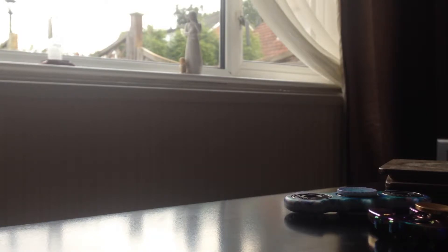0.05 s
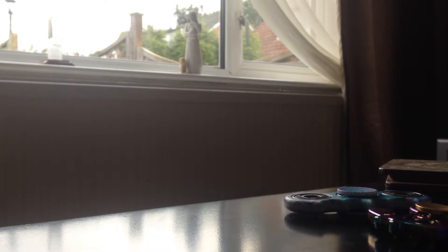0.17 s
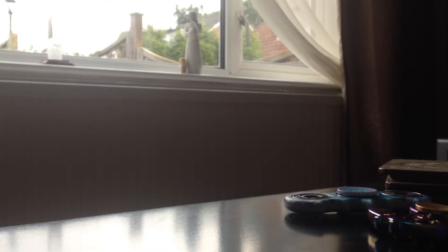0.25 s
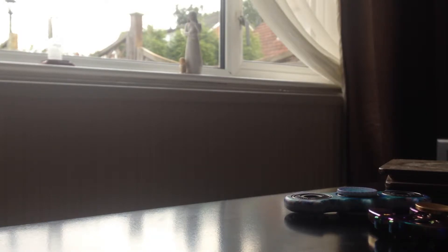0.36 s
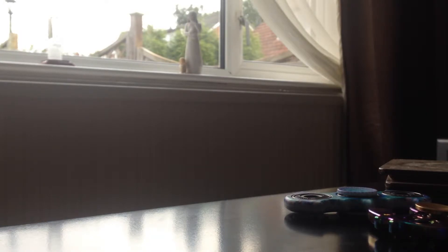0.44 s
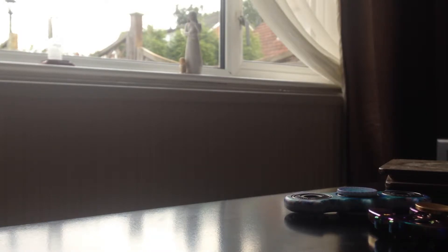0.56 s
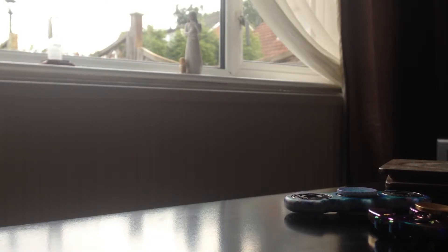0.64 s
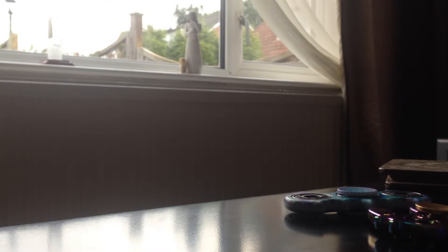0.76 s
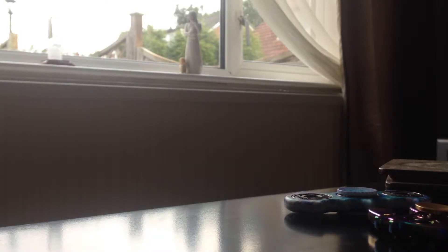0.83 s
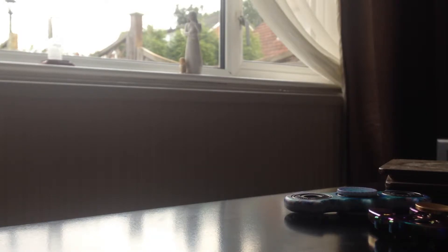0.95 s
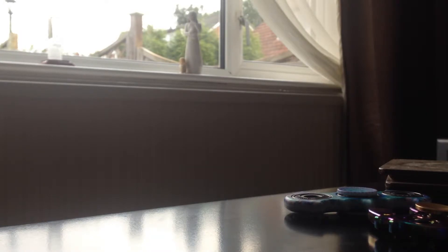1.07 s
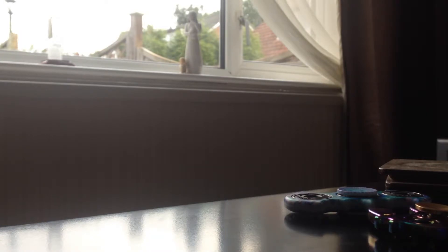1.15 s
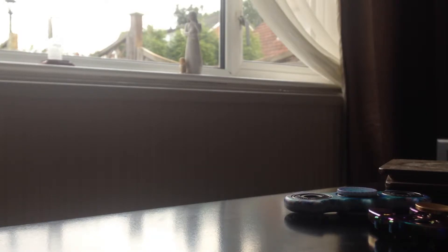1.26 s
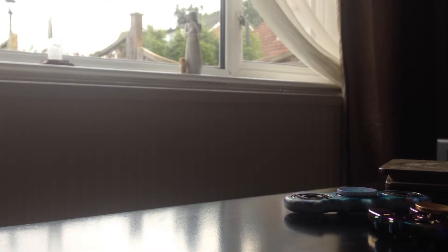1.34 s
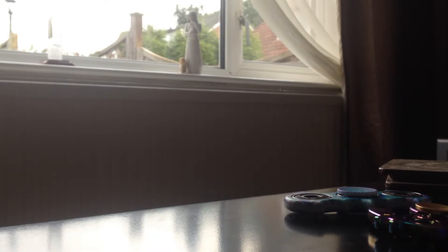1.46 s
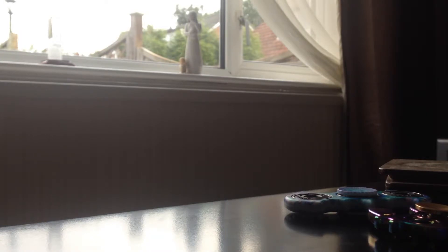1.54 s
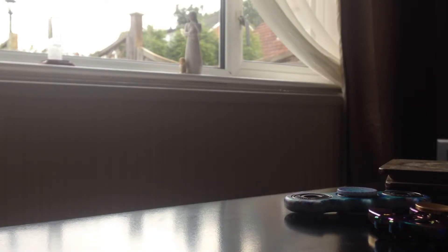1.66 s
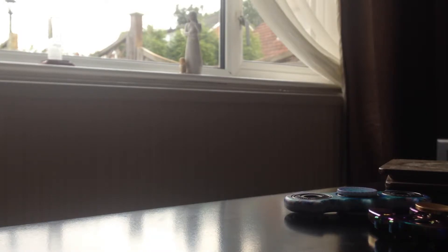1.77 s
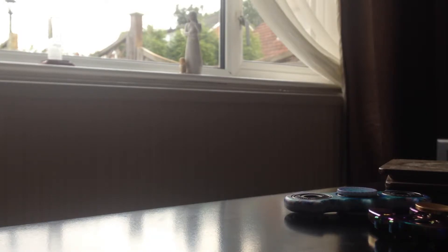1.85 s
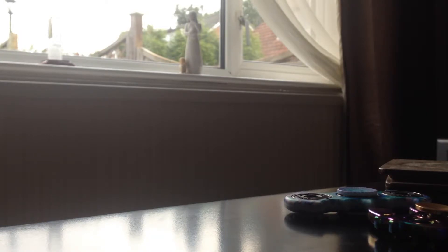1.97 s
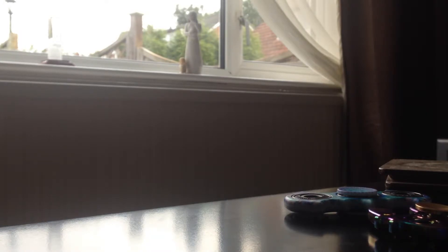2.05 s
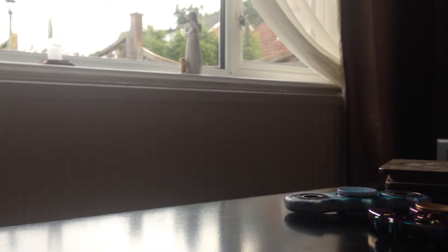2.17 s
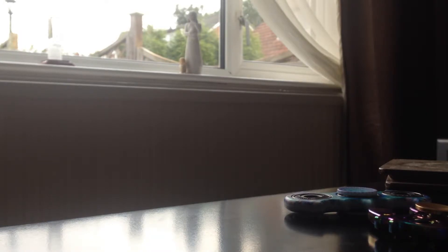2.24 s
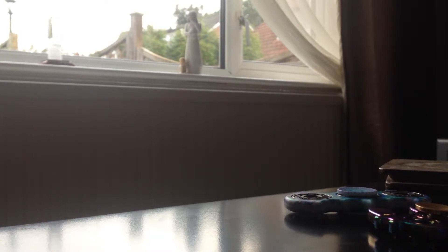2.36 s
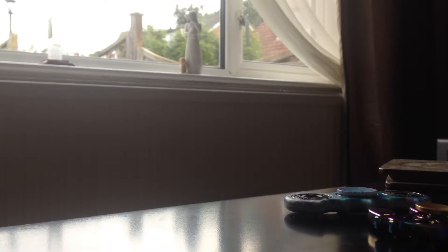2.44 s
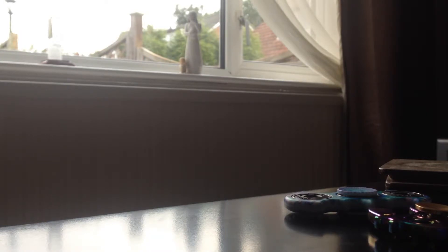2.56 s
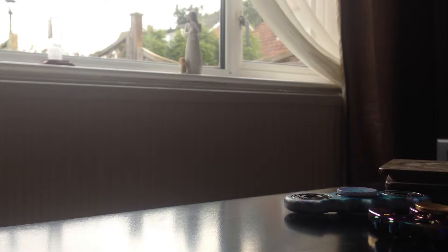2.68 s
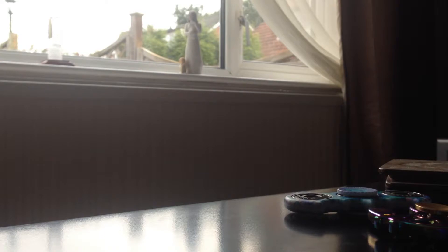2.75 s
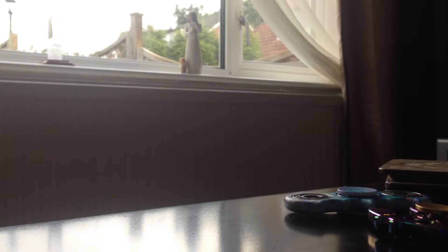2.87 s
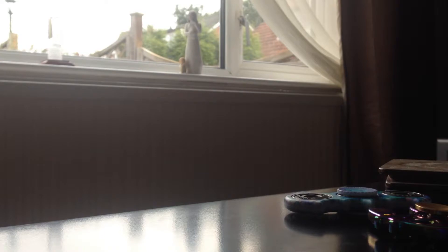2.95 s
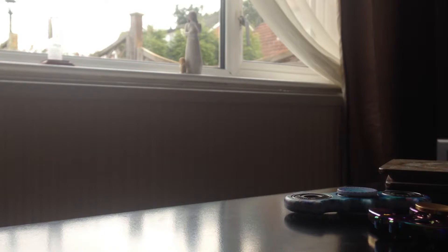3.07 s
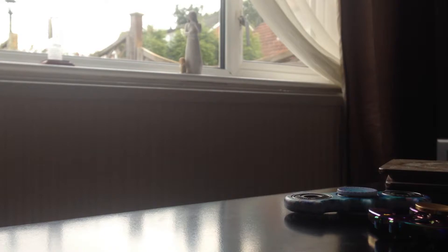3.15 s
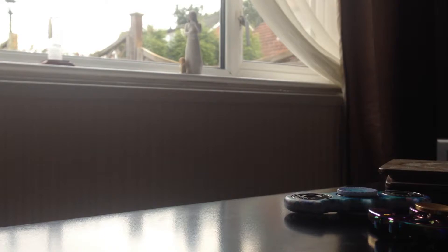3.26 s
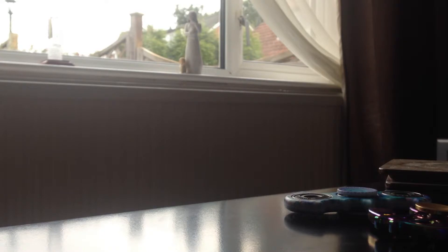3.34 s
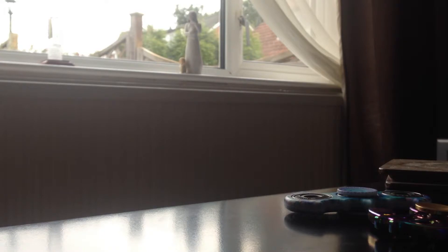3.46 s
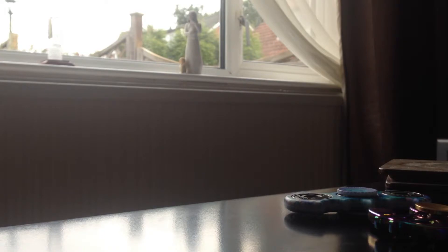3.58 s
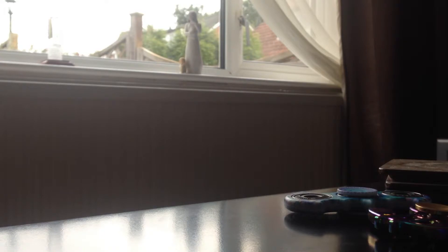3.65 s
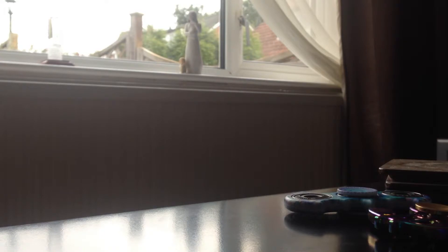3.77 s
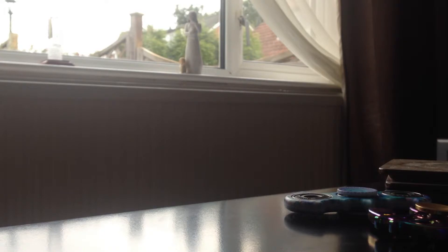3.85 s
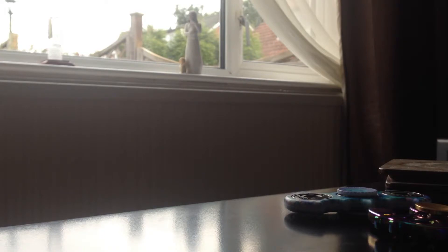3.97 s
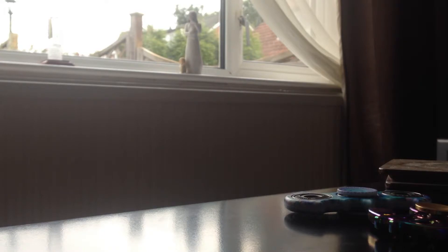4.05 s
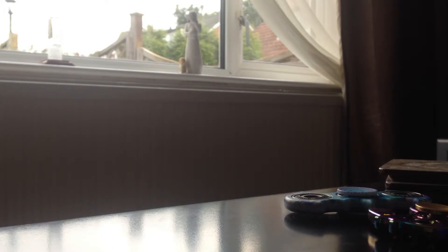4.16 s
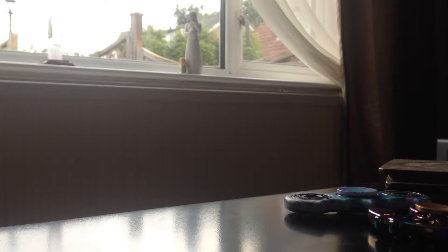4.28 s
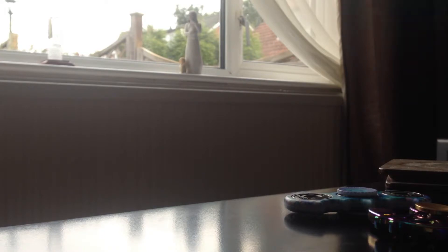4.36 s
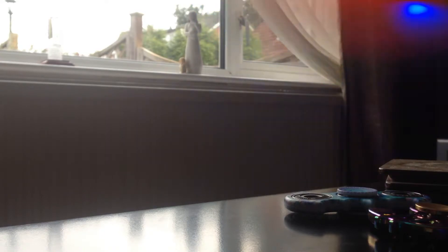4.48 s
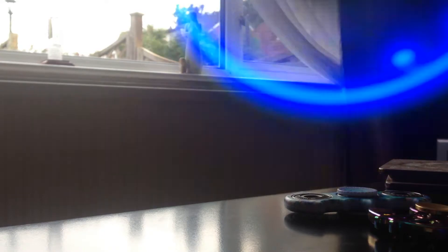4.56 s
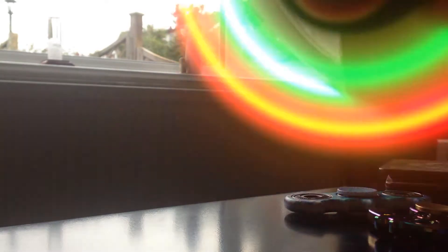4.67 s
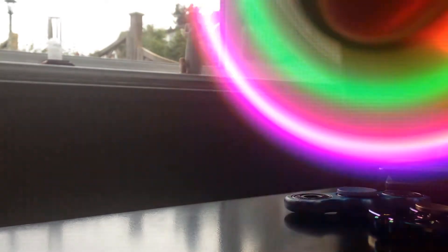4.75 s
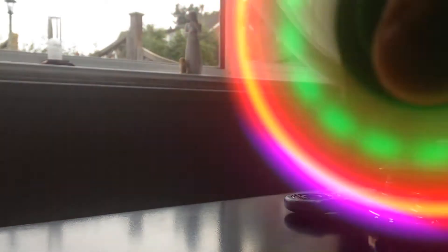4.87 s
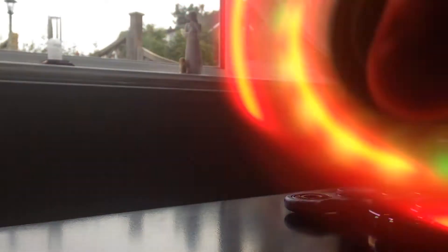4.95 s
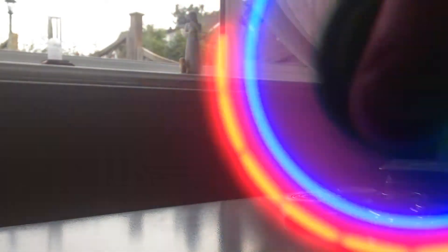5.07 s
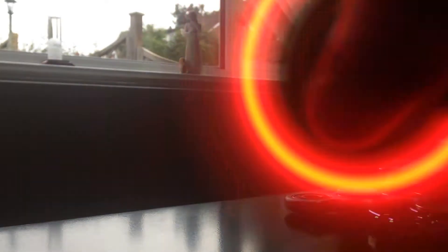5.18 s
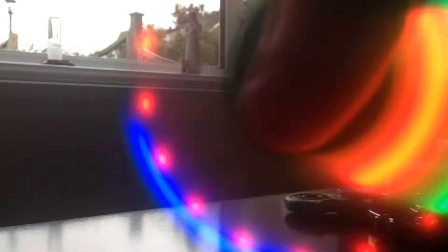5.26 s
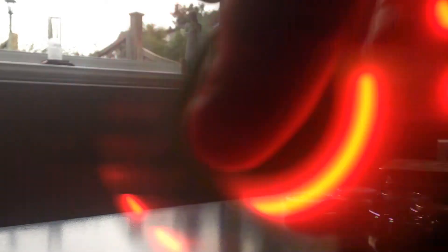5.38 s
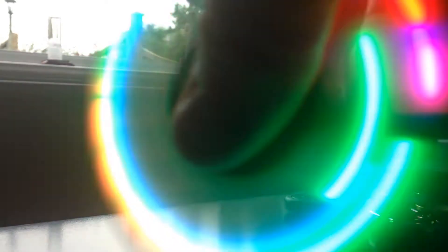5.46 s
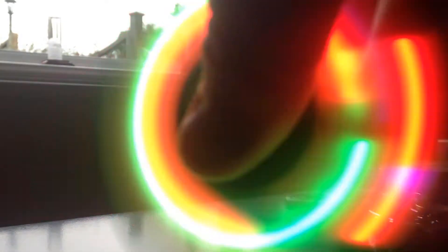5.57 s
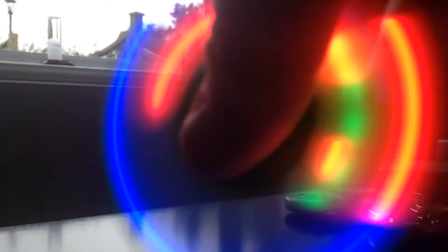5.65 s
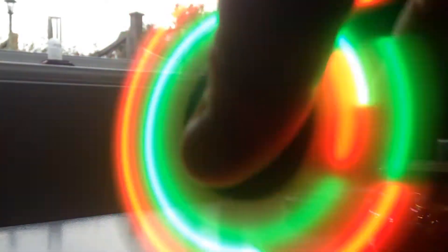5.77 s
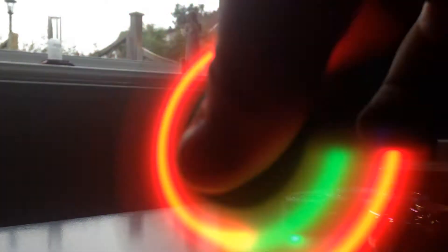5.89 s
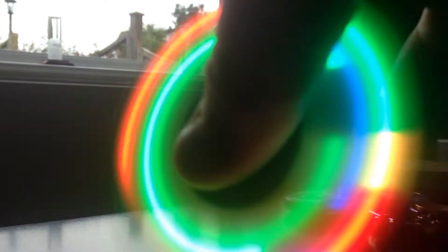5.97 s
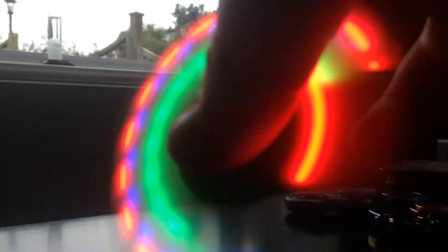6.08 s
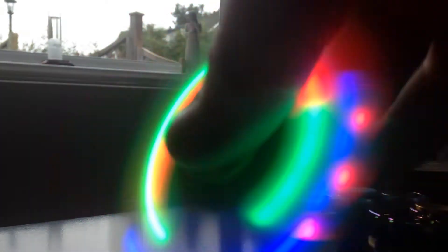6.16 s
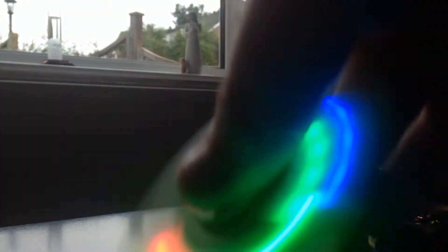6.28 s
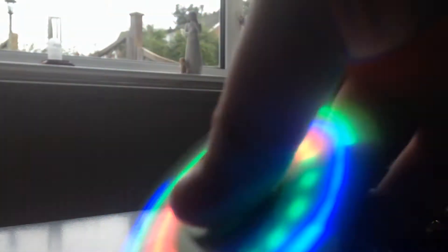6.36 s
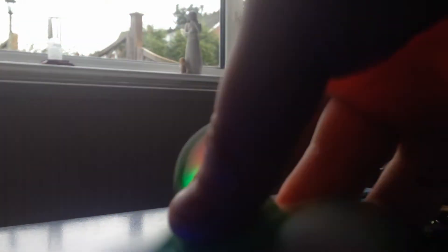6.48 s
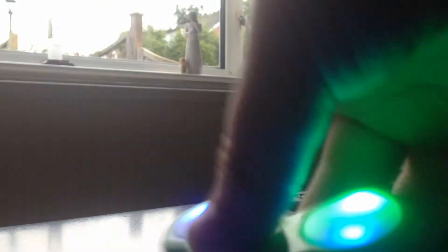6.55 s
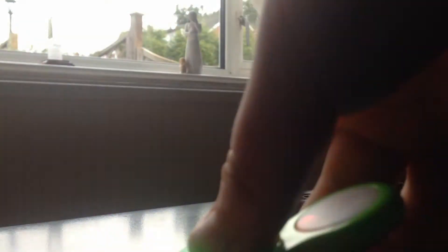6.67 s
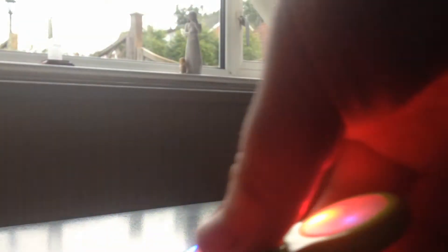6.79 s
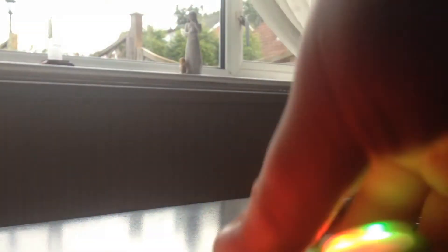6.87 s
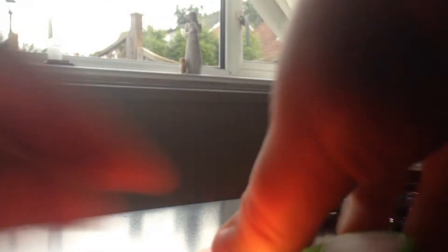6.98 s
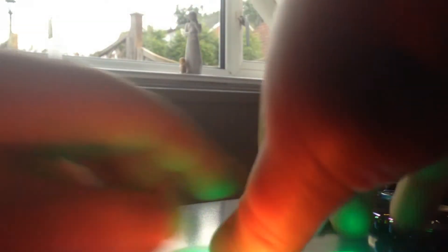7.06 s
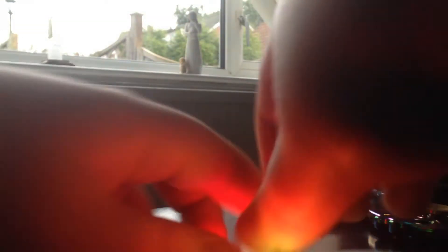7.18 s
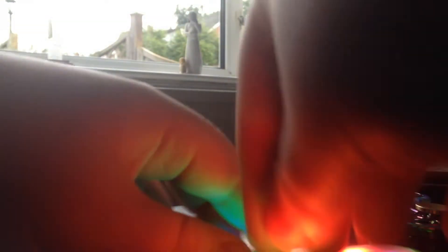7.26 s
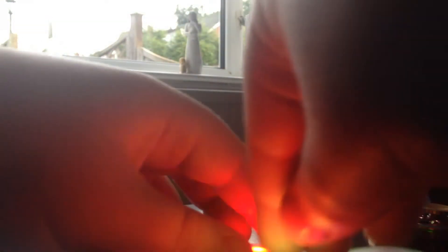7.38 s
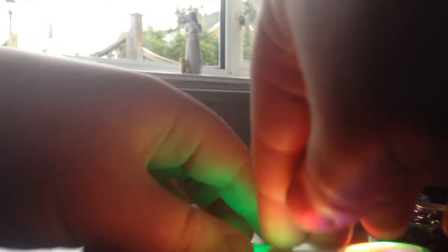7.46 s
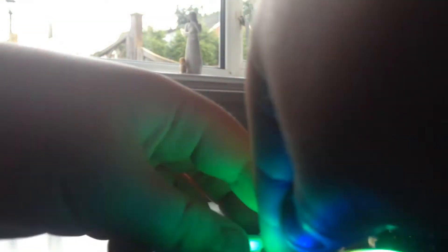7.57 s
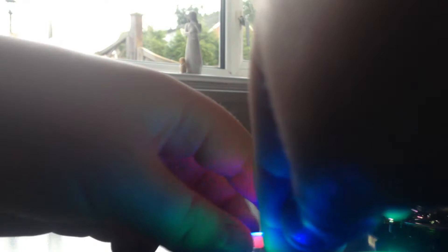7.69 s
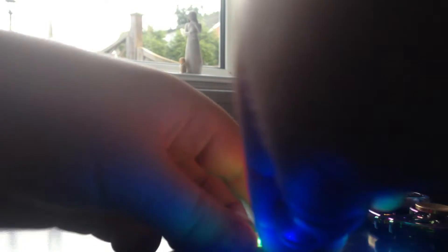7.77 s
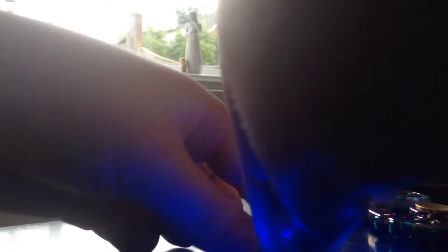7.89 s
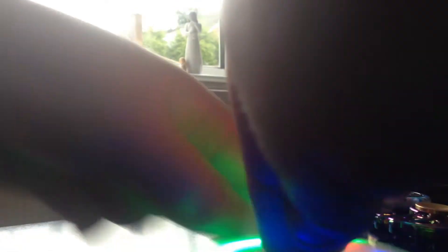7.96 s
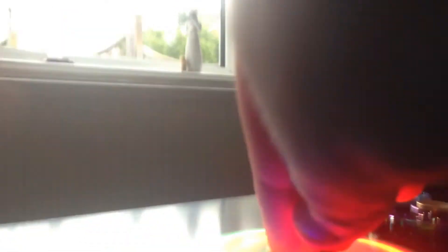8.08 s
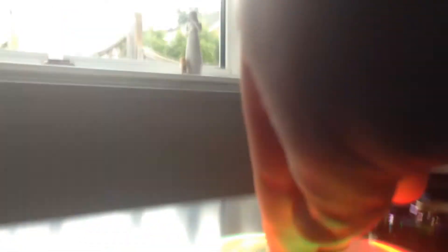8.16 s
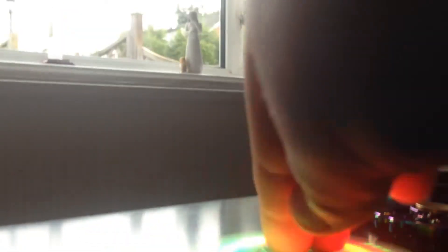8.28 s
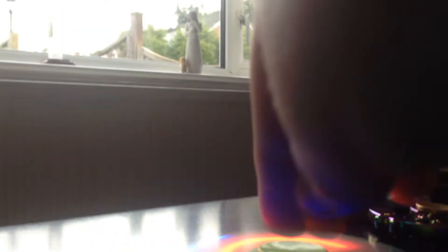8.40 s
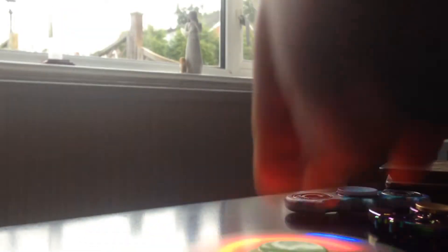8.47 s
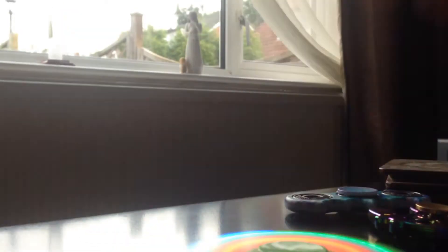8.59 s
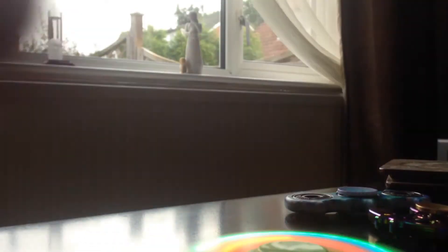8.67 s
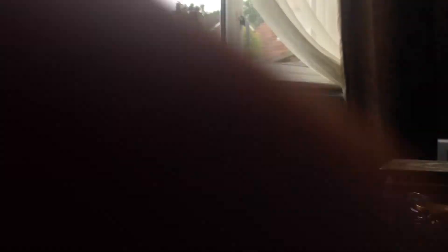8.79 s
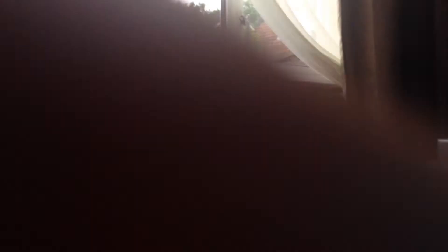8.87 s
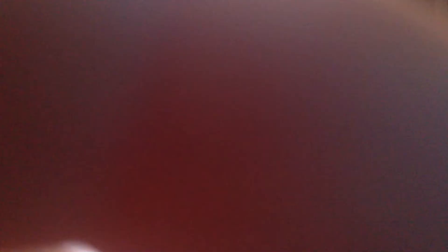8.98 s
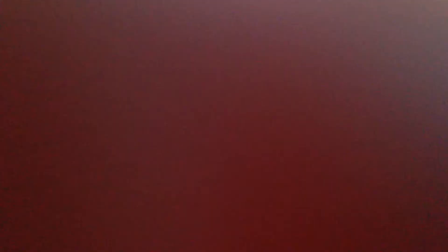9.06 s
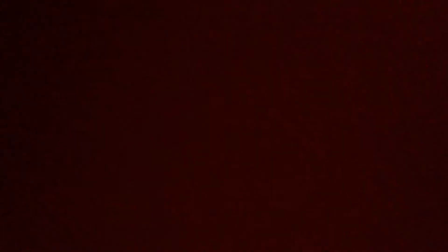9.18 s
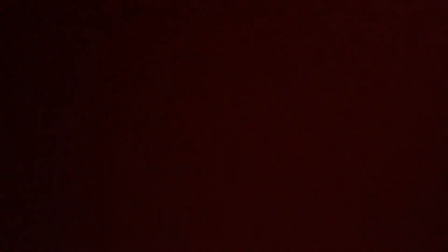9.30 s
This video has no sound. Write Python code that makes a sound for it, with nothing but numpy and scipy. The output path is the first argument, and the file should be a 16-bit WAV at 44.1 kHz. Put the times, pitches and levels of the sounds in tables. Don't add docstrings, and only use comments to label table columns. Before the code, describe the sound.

Close to the microphone in a still indoor room, a hand flicks a plastic spinner after a long near-silent wait. The metallic, airy whir swells, steadies, then ends in a rapid burst of very sharp clacks on the table top. Landings, small bounces, rubs and ticks follow, then a second flick starts a quieter rattling spin that lasts to the end, with a few dull bumps.

```python
import sys
import numpy as np
from scipy import signal
from scipy.io import wavfile

SR = 44100
rng = np.random.default_rng(int(sys.argv[2]) if len(sys.argv) > 2 else 0)


def decibels_to_gain(level_db):
    exponent = np.asarray(level_db, float) / 20
    return 10 ** exponent


def wav_record(signal):
    frames = np.transpose(np.atleast_2d(signal))
    bounded = np.clip(frames, -1, 1)
    quanta = np.round(bounded * 32767).astype(np.int16)
    wavfile.write(sys.argv[1], SR, quanta)


N = 411453

# f/Hz, level/dB per Hz
AIR_COLOUR = [(15, -30), (25, -16), (60, -5), (102, -4), (149, -3.5), (416, -8), (659, -5), (911, -12.5),
              (1260, -17.5), (2050, -13.5), (2910, -19.5), (6000, -22.5), (14400, -27.5), (16000, -30)]
# f/Hz, level/dB rms, phase/rad
HUM_TONES = [(99.2, -79, 0.0), (100.71, -81, -0.65)]
# t/s, hold/s, level/dB
CLOTH_RUBS = [
    (0.0, 0.4, -69),
    (1.6, 0.43, -73.5),
    (0.41, 0.039, -71.5),
    (2.95, 0.18, -72.5),
    (3.14, 0.042, -70),
    (3.4, 0.24, -70.5),
]
# t/s, hold/s, level/dB
TRAFFIC_SWELLS = [
    (0.0, 0.14, -71),
    (0.42, 0.036, -77),
    (1.33, 0.66, -74.5),
    (2.95, 0.27, -78.5),
    (3.3, 0.38, -73.5),
    (4.98, 0.37, -70),
    (5.5, 0.13, -66.5),
]
# t/s, peak level/dB, table share/dB, edge share/dB
FINGER_TICKS = [(0.1624, -60, -2.5, 10), (0.8048, -57, -6, -14), (1.041, -50, -19, -23),
                (1.074, -50, -27, -28), (1.1608, -49.5, 0, -28), (1.488, -48, 0, -29),
                (1.6756, -44.5, -16, -14), (1.8747, -53, -4, 3), (2.142, -43.5, -3.5, -29),
                (2.3331, -58.5, -29, 12.5), (2.6292, -51, -3, -21), (2.8852, -51, -2, -18),
                (2.9694, -57.5, -2, -19)]
# t/s, peak level/dB, f/Hz, decay/cycles
BALL_CHINKS = [(1.041, -70, 5750, 110), (1.6844, -68, 5700, 120), (2.333, -61, 5230, 83),
               (4.622, -37, 5020, 8.3), (6.493, -24.5, 5730, 21), (7.164, -35, 5810, 21),
               (7.183, -40, 5760, 29), (7.352, -54, 6030, 19), (7.3796, -55, 6040, 17),
               (7.204, -49, 5700, 12), (8.096, -23.5, 5810, 26), (8.103, -24.5, 5840, 21)]
# t/s, peak level/dB, f/Hz, decay/cycles
LOW_KNOCKS = [(1.333, -58, 400, 1), (1.626, -53.5, 330, 0.59), (2.732, -59, 333, 1.1),
              (2.887, -55, 400, 0.99), (3.918, -42, 122, 0.22), (6.444, -35, 595, 3.9),
              (8.082, -24, 402, 3.5), (8.092, -28, 558, 5.1), (9.134, -29.5, 378, 1.16),
              (9.214, -34, 190, 0.96), (9.278, -29, 173, 0.54)]

# t/s, peak level/dB, wood share/dB, edge share/dB
FLICK_HITS = [
    (3.8452, -34, -2, -20),
    (3.8496, -24.5, -17, -9.5),
    (3.8716, -25.5, -18, -8),
    (3.9174, -41, -3.5, -19),
]
STOP_HITS = [
    (6.4567, -3.5, -17, -14.5),
    (6.4772, -1.5, -17, -18),
    (6.4944, -18.5, -8.5, -15.5),
    (6.5121, -3, -12.5, -20),
    (6.5213, -32, -1, 4),
    (6.554, -3, -15, -16),
    (8.0314, -61, 6.5, 6.5),
    (8.0834, -21, -5, -10),
    (8.094, -17.5, -10.5, 0.5),
]
SET_DOWN_HITS = [
    (6.9814, -37, -7, -11),
    (6.9935, -3, -12.5, -16.5),
    (7.22, -4.5, -9, -33),
    (7.2324, -15, -12, -19),
    (7.2454, -25.5, 2, -7.5),
    (7.2614, -35.5, -1.5, -18.5),
    (7.4874, -10.5, -9.5, -19.5),
]
NUDGE_HITS = [(7.0684, -46.5, 16, -0.5), (7.1072, -22.5, -1.5, -10), (7.1467, -32, -12, -8),
              (7.1526, -30, 2.5, 2.5), (7.1656, -31.5, -1, -3), (7.2036, -47, -1, -20),
              (7.395, -51, -19, -5), (7.4076, -47, 0, -24), (7.6425, -38.5, -4.5, -15),
              (7.656, -37.5, -10, -12), (7.6824, -46, -5, -13), (7.7114, -51, 0, -13),
              (7.7692, -42, 0, -23), (7.7897, -39.5, 7.5, -6), (7.8321, -46, -18, -9.5)]

# f/Hz, level/dB, t60/s
SHELL_MODES = [(2050, -20.5, 0.01), (2800, -12.5, 0.003), (3080, -7, 0.019), (3400, -0.5, 0.0092),
               (4590, 5, 0.0053), (5020, -1.5, 0.006), (5600, 2.5, 0.002), (5900, 0.5, 0.0058),
               (6350, -8.5, 0.0055)]
# f/Hz, level/dB, t60/s
TABLE_MODES = [(673.5, -3.5, .07), (769, -2, 0.052), (880, 0.5, .055), (958, -3, 0.045), (1070, -3, 0.046),
               (1580, -18, 0.046)]
# f/Hz, level/dB, t60/s
EDGE_MODES = [(6950, 9, 0.0017), (8100, 9.5, 0.002), (9960, 4, 0.0038), (11200, 0, 0.0013),
              (12800, -3, .003), (14300, -3.5, .003)]
# f/Hz, level/dB, t60/s
PANEL_MODES = [(430, 0, .12), (597, -3, .08)]
# low f/Hz, high f/Hz, level/dB, t60/s
ROOM_BANDS = [(357, 430, -45, 0.27), (600, 1320, -34.5, 0.21), (1200, 2300, -32, 0.18),
              (2400, 3000, -37, 0.13), (3480, 12000, -44.5, 0.18), (6800, 21000, -43, .16)]

# t/s, hold/s, level/dB
GUSTS = [
    (3.85, .06, -55),
    (4.38, 0.2, -55.5),
    (4.75, 1.77, -59.5),
    (7.14, .14, -56),
    (7.51, .07, -63),
    (8.06, 0.035, -56),
    (9.2, .02, -45),
]
# t/s, level/dB
NEARNESS_CURVE = [
    (3.88, -48),
    (3.93, -61),
    (3.97, -66.5),
    (4.26, -60.5),
    (4.5, -48.5),
    (4.56, -48),
    (4.59, -56.5),
    (5.3, -53),
    (6.43, -53),
]
# t/s, cage f/Hz, race f/Hz
GRIP_TUNING = [
    (4.2, 4150, 5950),
    (4.29, 3400, 5900),
    (4.38, 4100, 5100),
    (4.52, 4050, 5900),
    (4.6, 4080, 5900),
    (4.65, 4080, 5130),
    (5.45, 4050, 5396),
    (5.66, 4200, 5900),
    (6.44, 4200, 5970),
]
# t/s, hold/s, level/dB against the free spin
THUMB_SQUEEZES = [
    (4.655, 0.14, 8),
    (4.9, 0.015, -6),
    (4.965, .02, 2),
    (5.03, 0.011, -1),
    (5.14, 0.061, 1),
    (5.35, 0.16, 1.5),
    (6.2, .15, -8),
]
# f/Hz (or a part tuned by the grip), width/Hz, level/dB
HELD_MODES = [
    [(650, 400, -12), (1380, 100, 1.5), (1750, 250, -6)],
    [("cage", 400, -3), (2900, 600, -8), (3450, 600, -8), (10300, 800, -11), (12300, 1800, -14),
     (14400, 2200, -9)],
    [("race", 380, 0), (5200, 300, -13), (5850, 350, -5)],
    [(6700, 350, 4), (7650, 400, -1), (8400, 500, -1), (9000, 400, -1)],
]
# level/dB, follows nearness/ratio, follows squeeze/ratio
HELD_MIX = [(-10, 1.23, 0.34), (0.2, 0.93, 0.041), (-1, 1.32, 0.96), (-1.1, 1.18, .2)]
# t/s, passes/Hz, level/dB rms
LOBE_BEATS = [
    (3.92, 67, -76),
    (4.2, 57, -63),
    (4.43, 64, -54.5),
    (4.55, 57, -61),
    (4.65, 51, -68),
    (5.1, 50, -85),
    (5.6, 48.5, -70),
    (5.85, 47, -79),
    (6.44, 40, -94),
]

# t/s, hold/s, level through the wood/dB, brightness/dB
TABLE_RUBS = [
    (6.559, 0.021, -50, -21),
    (6.679, 0.037, -72.5, -1.5),
    (6.818, 0.12, -65.5, -1.5),
    (7.031, .18, -53.5, -0.5),
    (7.343, 0.26, -66.5, -1),
    (7.668, 0.14, -65, -0.8),
    (8.092, 0.02, -41.5, -8),
]
# f/Hz, width/Hz, level/dB
LAID_MODES = [
    [(423, 48, 1.5), (689, 104, 6), (1015, 206, -3), (1720, 410, -0.5), (12400, 2000, -19.5),
     (14200, 2400, -21.5)],
    [(2726, 226, 5), (3210, 160, 5.5), (4030, 1170, -2)],
    [(4580, 680, -4), (6170, 1050, 2)],
    [(6860, 410, -7), (7400, 1430, 3), (8840, 590, -5.5), (10300, 930, -10)],
]
# pressed level/dB, free level/dB, follows shading/ratio
LAID_MIX = [(-38.5, -52.5, 0.053), (-45.5, -45, -0.03), (-58, -45.5, -0.7), (-51.5, -47, -1.27)]
# t/s, hold/s, level/dB
HAND_SHADING = [
    (8.9, 0.23, 7),
]


def rms_one(x):
    return x / np.sqrt(np.mean(x ** 2) + 1e-20)


def in_time(rows, outside=None):
    s, *columns = np.transpose(rows)
    return [np.interp(np.arange(N) / SR, s, c, outside, outside) for c in columns]


def drift(rate, size=N):
    r = np.exp(-80 * np.pi * rate / SR)
    chance = rng.standard_normal(size // 40 + 2002)
    slow = signal.lfilter([1], [1, -2 * r, r * r], chance)[2000:]
    return np.interp(np.arange(size) / 40, np.arange(len(slow)), rms_one(slow))


def swells(rows, rise_db_per_s, fall_db_per_s):
    t, gain = np.arange(0, N + 64, 64) / SR, 0
    for s, hold, db in rows:
        rise = rise_db_per_s * np.maximum(s - t, 0)
        fall = fall_db_per_s * np.maximum(t - s - hold, 0)
        gain = gain + decibels_to_gain(db - rise - fall)
    return np.interp(np.arange(N) / SR, t, gain)


def resonate(x, hz, width):
    r = np.exp(-np.pi * width / SR)
    turn = np.exp(2j * np.pi * np.cumsum(hz + 0 * x) / SR)
    return 2 * np.real(turn * signal.lfilter([(1 - r) ** 2], [1, -2 * r, r * r], x / turn))


def ring(clicks, hz, t60):
    r, w = decibels_to_gain(-60 / (t60 * SR)), 2 * np.pi * hz / SR
    return signal.lfilter([0, np.sin(w)], [1, -2 * r * np.cos(w), r * r], clicks + 1e-18)


def band(x, low_hz, high_hz):
    return signal.sosfilt(signal.butter(2, [low_hz, high_hz], "band", fs=SR, output="sos"), x)


def room_air():
    air, white = 0, rng.standard_normal((2, N))
    edges = 22 * 2 ** np.arange(0, 9.6, .5)
    hz, db = np.transpose(AIR_COLOUR)
    for k, (low, high) in enumerate(zip(edges, edges[1:])):
        colour_db = np.interp(np.log(low * high) / 2, np.log(hz), db)
        air = air + decibels_to_gain(colour_db + 1.3 * drift(2)) * band(white[k % 2], low, high)
    return decibels_to_gain(-71.5) * rms_one(air)


def mains_hum():
    t = np.arange(N) / SR
    return sum(np.sqrt(2) * decibels_to_gain(db) * np.sin(2 * np.pi * hz * t + phase) for hz, db, phase in HUM_TONES)


def cloth():
    fibres = rng.standard_normal(N) * decibels_to_gain(1.4 * drift(23))
    rub = rms_one(band(fibres, 850, 2380) + 0.24 * band(fibres, 1840, 5100))
    return decibels_to_gain(-5) * swells(CLOTH_RUBS, rise_db_per_s=34, fall_db_per_s=83) * rub


def traffic():
    far = resonate(rng.standard_normal(N), 690 + 45 * drift(4), 330) * decibels_to_gain(1.5 * drift(18))
    return swells(TRAFFIC_SWELLS, rise_db_per_s=118, fall_db_per_s=70) * rms_one(far)


def kind(rows, crack_ms, panel_db):
    return [(s, db, wood_db, edge_db, crack_ms, wood_db + panel_db) for s, db, wood_db, edge_db in rows]


def blows(rows, shell_db, table_db, edge_db, panel_db, ring_share, rise_s, grit_share, wood_grit,
          low_cut_hz, shell_cut_hz):
    start_s, peak_db, wood_share, edge_share, crack_ms, panel_share = np.transpose(rows)
    out, age = np.zeros(N), np.arange(1500) / SR
    span = slice(round(start_s.min() * SR), min(N, round((start_s.max() + .5) * SR)))
    struck = ((SHELL_MODES, shell_db, shell_cut_hz, grit_share),
              (TABLE_MODES, table_db + wood_share, low_cut_hz, wood_grit),
              (EDGE_MODES, edge_db + edge_share, shell_cut_hz, grit_share),
              (PANEL_MODES, panel_db + panel_share, .5 * low_cut_hz, wood_grit))
    for modes, share_db, cut_hz, grit_level in struck:
        contact = np.zeros(span.stop + len(age))
        for s, ms, db in zip(start_s, crack_ms, peak_db + share_db):
            pace = 1000 * age / max(ms, .3)
            grit = grit_level * rng.standard_normal(len(age)) * np.exp(-pace) * (1 - np.exp(-5 * pace))
            grit[0] = -2.6 / max(ms - 1, 1) ** 1.55
            contact[round((s + rise_s) * SR):][:len(age)] += decibels_to_gain(db) * grit
        rung = sum(decibels_to_gain(db) * ring(contact[span], hz, ring_share * t60) for hz, db, t60 in modes)
        out[span] += signal.sosfilt(signal.butter(4, cut_hz, "high", fs=SR, output="sos"), rung)
    return out


def finger_ticks():
    return blows(kind(FINGER_TICKS, crack_ms=2.84, panel_db=-6),
                 shell_db=-11, table_db=-4, edge_db=-17.0, panel_db=-0.5, ring_share=0.062, rise_s=0.0021,
                 grit_share=0.18, wood_grit=0.19, low_cut_hz=240, shell_cut_hz=440)


def pings(rows, swell_cycles, rough):
    out, age = np.zeros(N + SR), np.arange(SR // 8) / SR
    for s, db, hz, cycles in rows:
        shape = (1 - np.exp(-age * hz / swell_cycles)) * np.exp(-age * hz / cycles)
        waver = rms_one(resonate(rng.standard_normal(len(age)), hz, 500))
        tone = np.sin(2 * np.pi * hz * age) + rough * waver
        out[round(s * SR):][:len(age)] += decibels_to_gain(db) * shape / shape.max() * tone
    return out[:N]


def loose_balls():
    return pings(BALL_CHINKS, swell_cycles=5, rough=0.87)


def room(x):
    age, echo = np.arange(SR // 2) / SR, 0
    for low, high, db, t60 in ROOM_BANDS:
        echo = echo + decibels_to_gain(db - 60 * age / t60) * band(rng.standard_normal(len(age)), low, high)
    return signal.oaconvolve(x, echo * (1 - np.exp(-age / 0.00083)))[:N]


def low_knocks():
    return pings(LOW_KNOCKS, swell_cycles=0.41, rough=0)


def clacks():
    hard = (kind(FLICK_HITS, crack_ms=5.6, panel_db=-8) + kind(STOP_HITS, crack_ms=2.3, panel_db=-8.5)
            + kind(SET_DOWN_HITS, crack_ms=2.71, panel_db=-26) + kind(NUDGE_HITS, crack_ms=4.16, panel_db=-6.5))
    return blows(hard, shell_db=-17.5, table_db=-6.5, edge_db=-11.5, panel_db=-3.0, ring_share=0.56,
                 rise_s=0.00073, grit_share=0.35, wood_grit=0.11, low_cut_hz=523, shell_cut_hz=2150)


def draught():
    rumble = rms_one(band(rng.standard_normal(N), 53, 110))
    return decibels_to_gain(-10.0) * swells(GUSTS, rise_db_per_s=121.5, fall_db_per_s=108.5) * rumble


def bearing(start_s, end_s, levels, parts, turns, grain_db, throbs_db, flicker_db):
    start, end = round(start_s * SR), min(N, round(end_s * SR))
    size, out = end - start, np.zeros(N)
    load = np.cos(2 * np.pi * turns) + .5 * np.cos(4 * np.pi * turns + 1.0)
    moving = dict(zip(("cage", "race"), np.array(in_time(GRIP_TUNING))[:, start:end]))
    for level, modes, throb_db in zip(levels, parts, throbs_db):
        unevenness = np.minimum(rng.exponential(1, size), 5)
        grains = rng.standard_normal(size) * decibels_to_gain(grain_db * unevenness)
        sound = 0
        for k, (hz, width, db) in enumerate(modes):
            gain = decibels_to_gain(db + flicker_db * drift(36, size) + 1.63 * drift(3, size))
            centre_hz = moving.get(hz, hz) * (1 + .018 * drift(6, size))
            delayed = np.roll(grains, 331 * k)
            sound = sound + gain * resonate(delayed, centre_hz, 1.77 * width)
        out[start:end] += level[start:end] * rms_one(sound * decibels_to_gain(throb_db * load[start:end]))
    return out


def lobe_passes():
    return np.cumsum(in_time(LOBE_BEATS)[0]) / SR


def held_spin():
    near_db = in_time(NEARNESS_CURVE)[0]
    squeeze = 1 + swells(THUMB_SQUEEZES, rise_db_per_s=900, fall_db_per_s=399.5)
    last_db = NEARNESS_CURVE[-1][1]
    levels = [decibels_to_gain(last_db + db + follows * (near_db - last_db)) * squeeze ** loaded
              for db, follows, loaded in HELD_MIX]
    return bearing(NEARNESS_CURVE[0][0], NEARNESS_CURVE[-1][0] + .022, levels, HELD_MODES, lobe_passes() / 3,
                   grain_db=3.3, throbs_db=[1.5, 1.0, 1.7, 1.1], flicker_db=2.5)


def lobe_flutter():
    passes = lobe_passes()
    flutter = np.sin(2 * np.pi * passes) + decibels_to_gain(-15.0) * np.sin(4 * np.pi * passes)
    return np.sqrt(2) * flutter * decibels_to_gain(in_time(LOBE_BEATS, -140)[1])


def rustle():
    bright_rubs = [(s, hold, db + bright_db) for s, hold, db, bright_db in TABLE_RUBS]
    low = swells([row[:3] for row in TABLE_RUBS], rise_db_per_s=299.5, fall_db_per_s=168)
    high = swells(bright_rubs, rise_db_per_s=299.5, fall_db_per_s=168)
    clumps_db = 1.0 * np.minimum(rng.exponential(1, N), 5) + 3.2 * drift(46)
    grains = rng.standard_normal(N) * decibels_to_gain(clumps_db)
    wood = sum(decibels_to_gain(db) * ring(grains, hz, t60 / 2) for hz, db, t60 in TABLE_MODES)
    plastic = 0.016 * ring(grains, 3080, 0.012) + 0.031 * ring(grains, 5800, 0.0073)
    return low * rms_one(wood) + high * rms_one(band(grains, 2000, 6700) + plastic)


def laid_spin():
    start_s, settle_s, turns_per_s = 8.112, 0.33, 11
    t = np.arange(N) / SR
    shade = 1 + swells(HAND_SHADING, rise_db_per_s=60, fall_db_per_s=302)
    pressed = np.exp(-np.maximum(t - start_s, 0) / settle_s)
    levels = [decibels_to_gain(free_db + (pressed_db - free_db) * pressed) * shade ** shaded
              for pressed_db, free_db, shaded in LAID_MIX]
    return bearing(start_s, N / SR, levels, LAID_MODES, turns_per_s * t,
                   grain_db=2.5, throbs_db=[0.58, 0.44, 0.86, 0.31], flicker_db=2.5)


def scene():
    background = room_air() + mains_hum() + draught() + traffic()
    handling = cloth() + finger_ticks() + low_knocks() + rustle()
    spinner = held_spin() + lobe_flutter() + laid_spin()
    loud = clacks() + loose_balls()
    return (loud + room(loud) + spinner + handling + background)[None]


def low_pass(x):
    return signal.sosfilt(signal.butter(12, 16520, fs=SR, output="sos"), x)


def record(dry):
    limited = 1.322 * np.tanh(dry / 1.235)
    top_cut = signal.ellip(12, .5, 60, 15300, fs=SR, output="sos")
    return low_pass(signal.sosfilt(top_cut, limited))


dry = scene()
out = record(dry)
wav_record(out)
```